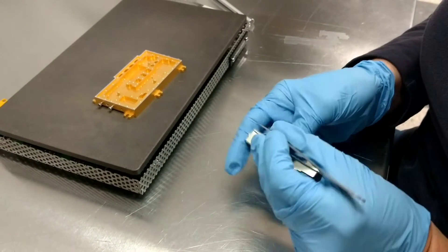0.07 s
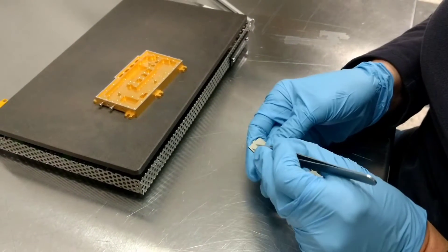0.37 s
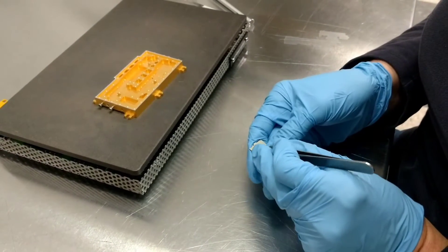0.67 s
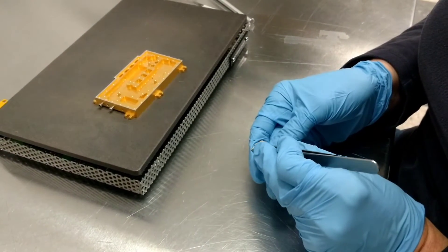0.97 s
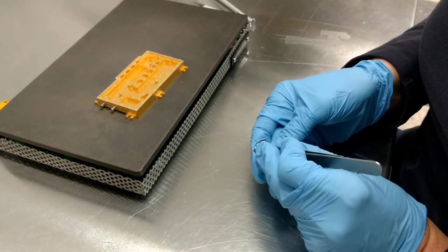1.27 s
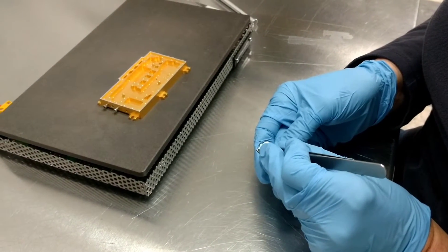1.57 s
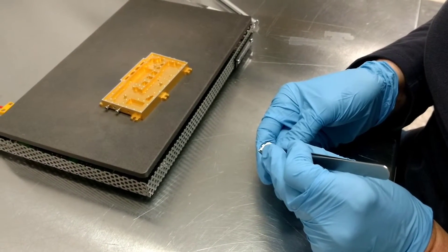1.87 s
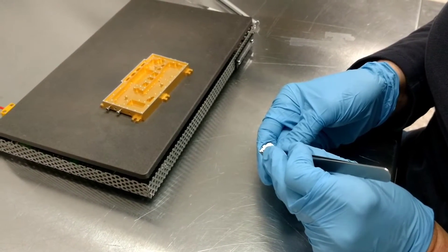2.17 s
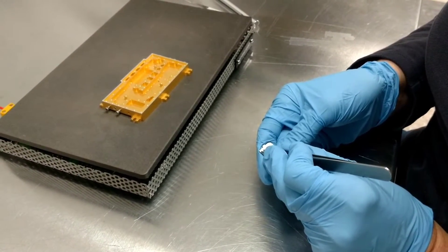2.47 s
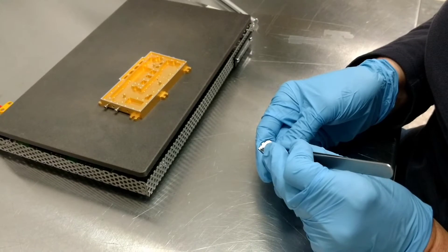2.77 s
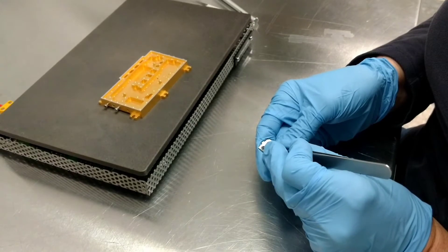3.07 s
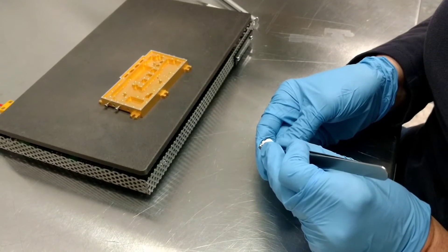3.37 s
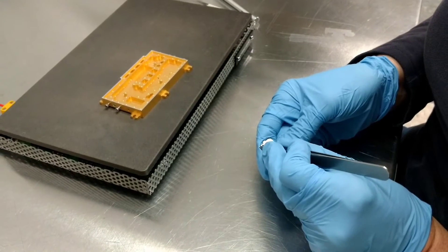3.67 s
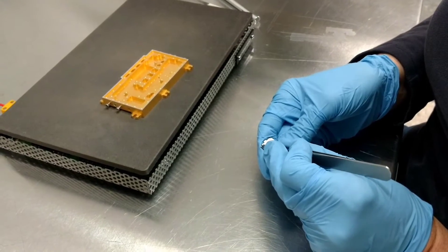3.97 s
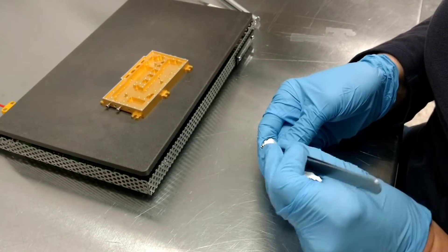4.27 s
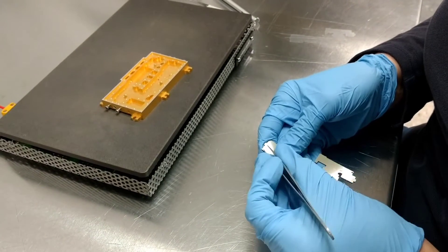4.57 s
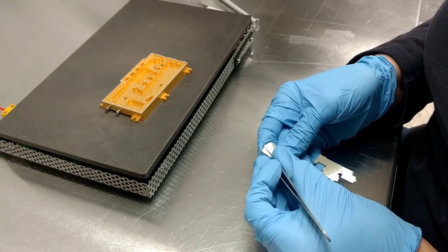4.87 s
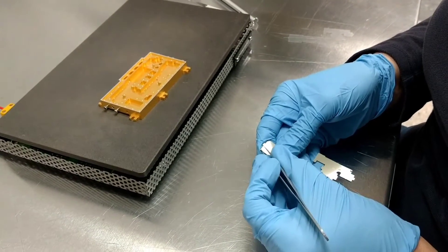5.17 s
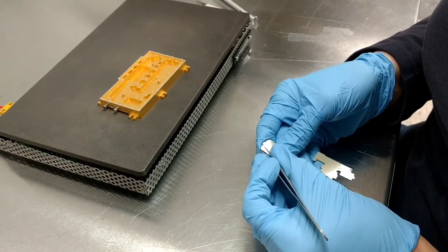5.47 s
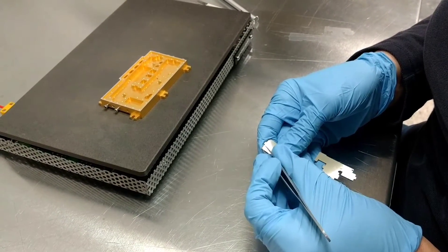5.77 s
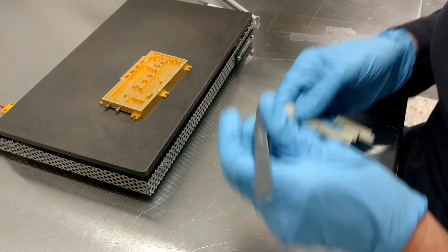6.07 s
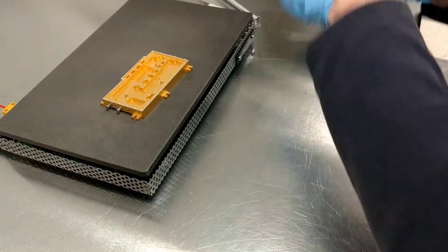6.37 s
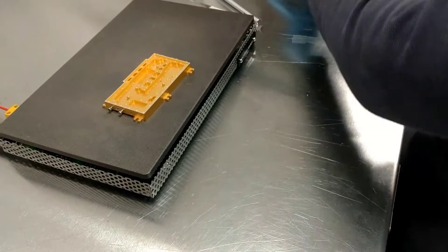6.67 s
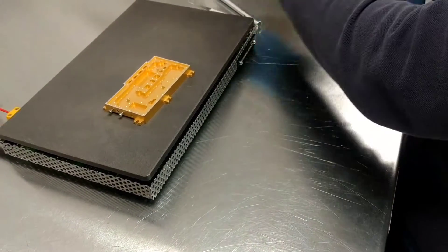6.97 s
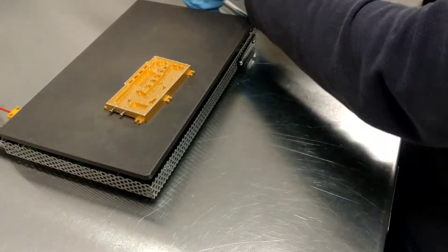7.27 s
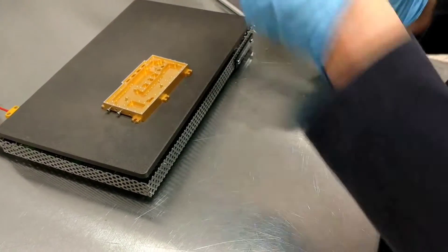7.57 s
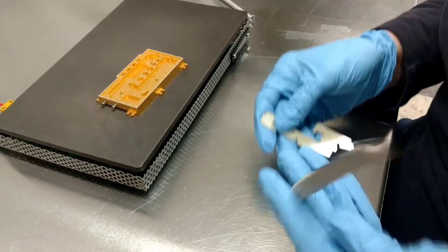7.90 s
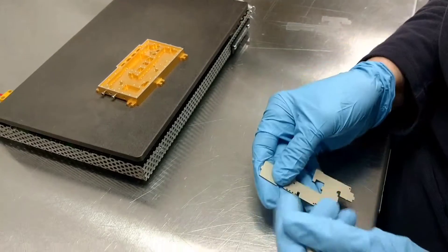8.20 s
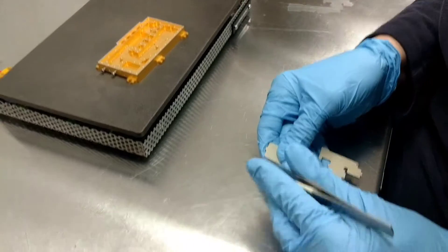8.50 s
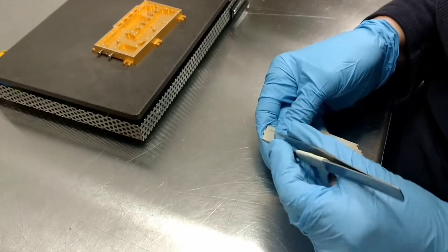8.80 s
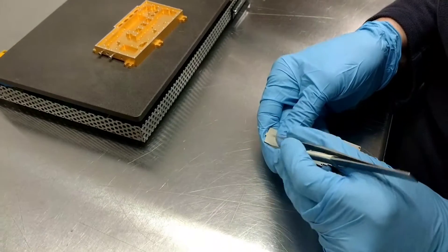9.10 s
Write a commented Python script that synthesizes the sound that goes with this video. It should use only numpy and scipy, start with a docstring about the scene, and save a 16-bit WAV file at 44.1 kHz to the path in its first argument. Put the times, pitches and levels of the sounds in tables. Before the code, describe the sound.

Steady equipment hum and rushing air, broken late by one sharp snap, a brief rattle and a small metallic clink.

```python
"""A laboratory bench. Fans and a motor hum over a steady rush of air, and a low drone soon dies away.
A glove rustles, then tweezer tips tick twice. Near seven seconds a catch snaps open, loose parts
scrape and rattle, and a small metal part slides and clinks down. Last, gloves crinkle and sleeves rustle.
After the sharpest clicks a limiter turns the hum down and lets it swell again."""
import sys
import numpy as np
from scipy import signal
from scipy.fft import rfft, irfft
from scipy.io import wavfile
from scipy.ndimage import uniform_filter1d, minimum_filter1d

SR = 44100
rng = np.random.default_rng(int(sys.argv[2]) if len(sys.argv) > 2 else 0)


def waveform_to_disk(signal):
    """Save audio, clipped to [-1, 1], as 16-bit WAV at the path in sys.argv[1]."""
    frames = np.transpose(np.atleast_2d(signal))
    scaled = np.clip(frames, -1, 1) * 32767
    samples = np.round(scaled).astype(np.int16)
    wavfile.write(sys.argv[1], SR, samples)


N = 407484
TIME = np.arange(N) / SR
FREQ = np.arange(N // 2 + 1) * SR / N + 1e-6
SHAFT_HZ = 59.025  # motor turns per second

# Hollow resonances of the loose parts. Each row: pitch in Hz, width in Hz, boost in dB.
LOOSE_BODY = [(3750, 400, 8), (5300, 650, 11), (8300, 300, 4), (9100, 250, 5), (9740, 300, 7),
              (11200, 300, 5), (12450, 500, 6), (13400, 300, 6)]
# Damped resonances of the small metal part. Each row: pitch in Hz, width in Hz, boost in dB.
METAL_BODY = [(4150, 400, -10), (5300, 350, 8), (7000, 450, 6), (8500, 540, 2), (9600, 400, 6),
              (10900, 450, 6), (12200, 400, 4), (13800, 400, 4)]


def undb(db):
    """Turn decibels into a gain."""
    return 10 ** (np.asarray(db) / 20)


def spectrum(points, hz):
    """Join (Hz, value) points into a curve, giving each octave equal room."""
    point_hz, value = np.transpose(points)
    return np.interp(np.log(hz), np.log(point_hz), value)


def peaks(resonances):
    """The boost in dB that resonances give each frequency."""
    return sum(lift / (1 + (2 * (FREQ - hz) / width) ** 2) for hz, width, lift in resonances)


def pan(db):
    """Two gains that make the left side db louder than the right."""
    return undb(np.array([[1], [-1]]) * db / 2)


def wander(rate_hz):
    """A smooth random curve with a spread of 1, moving at up to about rate_hz."""
    curve = irfft(rfft(rng.standard_normal(N)) / (1 + (FREQ / rate_hz) ** 4), N)
    return curve / curve.std()


def hiss(colour, resonances=()):
    """Shaped noise of average strength 1, unrelated left and right."""
    gain = undb(spectrum(colour, FREQ) + peaks(resonances))
    noise = irfft(rfft(rng.standard_normal((2, N))) * gain, N)
    return noise / noise.std()


def fade(age, t60):
    """Die away from age 0, falling 60 dB in t60 seconds."""
    return (age >= 0) * np.exp(-np.log(1000) * np.clip(age / t60, 0, 10))


def swell(start, attack, hold, t60):
    """Rise in a straight line, hold, then die away; times are in seconds."""
    age = TIME - start
    return np.clip(age / attack, 0, 1) * fade(np.maximum(age - attack - hold, 0), t60)


def likeness(hz, ripple_hz=2200):
    """How alike left and right are, as a complex number: unequal paths put the treble out of step."""
    # Match of the two sides. Each row: frequency in Hz, correlation from -1 to 1.
    match = [(125, -0.46), (175, 0.23), (280, 0.83), (390, 0.14), (580, 0.22), (750, 0.81), (1050, 0.98),
             (1500, 0.35), (2200, 1), (3300, 0.15), (4400, 0.94), (6500, 0.56), (10000, -0.00075)]
    turn = 2 * np.pi * np.maximum(hz / ripple_hz - .5, 0)
    depth = np.clip(spectrum(match, hz), -.98, .98)
    return depth * (np.cos(turn) - 0.7j * np.sin(turn))


def tone(hz, right_phase):
    """A sine on a moving pitch, with the right side ahead by right_phase radians."""
    phase = 2 * np.pi * (np.cumsum(hz) / SR + rng.random())
    return np.sqrt(2) * np.sin([phase, phase + right_phase])


def crack(start, db, rise, t60, room_db=-19, room_t60=.27):
    """Power of one contact over time: a quick burst and a short echo of the room."""
    age = TIME[:SR]
    onset = np.minimum(age / max(rise, 1 / SR), 1)
    decay = fade(age, t60) ** 2 + (undb(room_db) * fade(age, room_t60)) ** 2
    return np.pad((undb(db) * onset) ** 2 * decay, (int(start * SR), N))[:N]


def ring(start, notes, db, tilt_db=0, build_cycles=9):
    """Struck metal rings, its low notes building more slowly; tilt_db is added per octave up."""
    age = TIME[:SR]
    out = 0
    for hz, note_db, t60 in notes:
        gain = undb(db + note_db + tilt_db * np.log2(hz / notes[0][0]))
        onset = np.minimum(age * hz / build_cycles, 1)
        phase = 2 * np.pi * (hz * age + rng.random()) + np.array([[0], [rng.normal()]])
        out = out + gain * onset * fade(age, t60) * np.sin(phase)
    return np.pad(out, ((0, 0), (int(start * SR), N)))[:, :N]


def air(swell_db=0.65):
    """Swirling air from the fans rushes through ducts, almost steady."""
    # The rush. Each row: frequency in Hz, level in dB per Hz.
    rush = [(40, -87), (55, -72.5), (80, -71), (120, -58.5), (160, -63), (245, -58), (310, -64),
            (430, -63.5), (610, -67.5), (740, -66.5), (1050, -73.5), (1650, -75.5), (2500, -86.5),
            (5500, -90.5), (10500, -100)]
    # Duct resonances. Each row: pitch in Hz, width in Hz, boost in dB.
    ducts = [(147, 12, 2), (198, 12, 1.5), (238.6, 12, 1), (287, 8.1, 1.5), (426.4, 18.5, 5),
             (518, 11.4, 4), (525, 19.6, 5), (545.6, 14, 5.5)]
    # Balance of the sides. Each row: frequency in Hz, left minus right in dB.
    balance = [(100, 2.5), (250, -3), (700, 0.5), (3500, 0.5), (5500, 2), (8500, 6), (12000, -2)]
    left, unrelated = rfft(rng.standard_normal((2, N)))
    alike = likeness(FREQ)
    right = alike * left + np.sqrt(1 - abs(alike) ** 2) * unrelated
    colour = undb(spectrum(rush, FREQ) + peaks(ducts)) * pan(spectrum(balance, FREQ))
    return irfft(np.array([left, right]) * colour, N) * np.sqrt(SR / 2) * undb(swell_db * wander(4.3))


def fans(drift_hz=0.3, waver_db=1.4):
    """Fans and transformers hum; each tone drifts on its own, and close neighbours beat."""
    # Each row: pitch in Hz, level in dB, left minus right in dB, right side's lead in radians.
    hum_tones = [(59.2, -56, 1, 2.3), (105.6, -45.5, -3, 2.4), (118.8, -40.3, 2, 2.4),
                 (123.5, -47.5, 1, 2.4), (130, -38.7, -3, 2.4), (180, -51.5, 3, 1.4), (211.3, -54, -6, -.6),
                 (239.9, -44.5, -4, .9), (287.8, -41.5, -3, .6), (356.6, -55, 3, -1), (416, -52, -2, .9),
                 (475.4, -51, -6, 2.4), (531.1, -54, -1, .8), (572.1, -46, 1, 2.5), (575.8, -53, -1, -1),
                 (650.2, -58, 6, .5), (653.7, -58, 13, 1.3), (718.7, -53, 3, .3), (860.2, -50.3, -2, .7),
                 (942.8, -63, 1, 0), (1783.9, -67, 0, 0)]
    out = 0
    for hz, db, side_db, right_phase in hum_tones:
        hum = tone(hz + drift_hz * wander(1.0), right_phase)
        out = out + hum * undb(db + waver_db * wander(3.7)) * pan(side_db)
    return out


def fan_blade(hz=692.3, db=-39.5, drift_hz=0.31, waver_db=1.6, screen_db=-3):
    """The leading fan tone turns softer as the worker leans across the bench and screens it."""
    screened = np.clip(TIME - 5.8, 0, 1)  # leaning over takes one second
    gain = undb(db + screen_db * screened + waver_db * wander(5.5))
    return tone(hz + drift_hz * wander(0.62), right_phase=0.49) * gain * pan(-1)


def motor_whine(slip=.0002, waver_db=3.5):
    """A two-pole motor whines at high multiples of its turning rate, each swelling and fading."""
    # The strongest multiples of the turning rate, and the level of each in dB.
    multiples = [20, 21, 22, 23, 24, 25, 26, 28, 37, 53, 59, 60, 65, 72]
    levels_db = [-54, -57.5, -63.5, -68, -66.5, -61.5, -90, -62.5, -70, -81, -80.5, -83, -76, -76]
    # Swells of single tones. Each row: multiple, peak time in seconds, length in seconds, boost in dB.
    swells = [(20, 3.4, .9, 5), (20, 4.75, .8, 3), (20, 6.6, .5, 4), (21, .65, .6, 9), (21, 2.5, .9, 5),
              (21, 3.25, .5, 10), (21, 4.75, .6, 9), (21, 6.7, .7, 7), (21, 8.7, .9, 6), (24, .95, .6, 12),
              (24, 2.15, .6, 11), (24, 4.15, .6, 11), (24, 6.35, .4, 7), (24, 8.4, 1.2, 10),
              (25, 1.9, .5, 7), (25, 3.9, .7, 10), (25, 6.1, .7, 9), (53, .27, .18, 14), (53, .5, .25, 22),
              (53, .85, .45, 15), (53, 2.5, .35, 9), (53, 3.65, .4, 9)]
    shaft_hz = SHAFT_HZ * (1 + slip * wander(0.95))
    out = 0
    for multiple, db in zip(multiples, levels_db):
        lift_db = sum(boost * .5 ** ((2 * (TIME - peak) / length) ** 2)
                      for which, peak, length, boost in swells if which == multiple)
        whine = tone(multiple * shaft_hz, np.angle(likeness(multiple * SHAFT_HZ)))
        out = out + whine * undb(db + lift_db + waver_db * wander(3.0))
    return out


def motor_buzz(width_hz=0.64):
    """The motor's weak multiples: thin bands of noise, like tones that the room makes waver."""
    # Strength of the buzz. Each row: frequency in Hz, level of one band in dB.
    colour = [(1100, -94), (2000, -64), (2700, -89), (3200, -73.5), (4400, -84.5), (5300, -77.5),
              (7500, -100), (8400, -91), (9400, -81)]
    off_multiple_hz = (FREQ / SHAFT_HZ + .5) % 1 * SHAFT_HZ - SHAFT_HZ / 2
    comb = np.exp(-np.pi / 2 * (off_multiple_hz / width_hz) ** 2) / np.sqrt(width_hz)
    in_range = (FREQ > colour[0][0]) & (FREQ < colour[-1][0])
    left = rfft(rng.standard_normal(N)) * comb * in_range * undb(spectrum(colour, FREQ))
    right = left * np.exp(1j * np.angle(likeness(FREQ)))
    return irfft([left, right], N) * np.sqrt(SR / 2)


def drone(hz=102.5, sag_hz_per_s=1.4, db=-31.5, fade_db_per_s=6.5, stop_s=1.45):
    """A low tone sags in pitch as it fades, then dies away quickly."""
    gain = undb(db - fade_db_per_s * TIME) * fade(np.maximum(TIME - stop_s, 0), t60=1)
    return tone(hz - sag_hz_per_s * TIME, right_phase=2.12) * gain


def sleeves(grain_db=1.3):
    """Sleeves and gloves rub in small uneven slips; slow strokes also die away slowly."""
    # Each row: start in seconds, rise in seconds, level in dB.
    strokes = [(.15, .045, -53), (7.69, .185, -45), (8.13, 0.063, -48), (8.231, 0.044, -48),
               (8.37, .06, -55)]
    # Rubbing cloth and rubber. Each row: frequency in Hz, level in dB.
    colour = [(500, 2), (2000, -3), (3500, 10.5), (5500, 3), (8500, 9), (10000, 2), (16000, 2),
              (20000, -20)]
    power = sum((undb(db) * swell(start, rise, hold=0, t60=3.3 * rise)) ** 2 for start, rise, db in strokes)
    return hiss(colour) * np.sqrt(power) * undb(grain_db * wander(220)) * pan(1.5)


def tweezers(ping_hz=17000, contact_s=0.00032, scratch_db=-23):
    """Steel tips meet with a faint scratch and a very high ping, which record() later filters out."""
    # Each row: time in seconds, level in dB.
    ticks = [(1.241, -17), (2.942, -5.5)]
    scratch = undb(scratch_db) * hiss([(4000, -26), (9000, -3), (13000, -1)])
    out = 0
    for start, db in ticks:
        age = np.maximum(TIME - start, 0)
        push = age / contact_s * np.exp(1 - np.minimum(age / contact_s, 50))
        out = out + undb(db) * push * (np.sin(2 * np.pi * ping_hz * age) + scratch)
    return out


def snap():
    """A catch gives way with a bright crack and rings; its casing answers later and duller."""
    # Each row: start in seconds, level in dB, rise in seconds.
    contacts = [(6.759, -28, .002), (6.764, -4, 0.00051)]
    # The crack and the casing's answer. Each row: frequency in Hz, level in dB.
    crack_colour = [(150, -25), (500, -7), (1100, 8), (2400, -20), (3300, -7), (6500, -7), (11000, -1),
                    (15000, 2), (17000, 6.5), (20000, 1)]
    case_colour = [(150, -17), (1000, 5), (1700, -3), (2500, -3), (3700, 3), (5400, 1), (7000, 0),
                   (9000, -3), (14000, -20)]
    # The ringing catch. Each row: pitch in Hz, level in dB, seconds to fall 60 dB.
    notes = [(1820, -7, .13), (3840, -9, 0.16), (5070, -9, .11), (5760, -0.5, 0.094), (6050, -6, .1),
             (7000, -3, .1), (7526, -4, .09), (7970, -1, .11), (9200, -1, 0.13), (10340, -1, .08),
             (11330, 1.5, .085), (11660, 0, .06), (13700, 3, .07)]
    open_s = contacts[-1][0]
    power = sum(crack(start, db, rise, t60=0.074, room_db=-21) for start, db, rise in contacts)
    case_power = crack(open_s, db=-15, rise=0.017, t60=0.14, room_db=-13)
    burst = np.sqrt(power) * hiss(crack_colour)
    casing = np.sqrt(case_power) * hiss(case_colour)
    return burst + casing + ring(open_s, notes, db=-18.5)


def scrape(db=-27, grit_db=0.5):
    """Loose parts rub on each other between their knocks, then settle smoothly."""
    # The rubbing. Each row: frequency in Hz, level in dB.
    colour = [(150, -20), (500, 10), (1100, 9.5), (2400, -8), (3200, 2), (5000, -4), (7000, 2), (10000, -1),
              (15000, -6), (20000, -20)]
    push = swell(start=6.821, attack=0.0042, hold=0.072, t60=0.46)
    return hiss(colour, LOOSE_BODY) * push * undb(db + grit_db * wander(600)) * pan(0.5)


def knocks(rise_s=0.0033, ring_db=-15.5, grit_db=1.0):
    """The loose parts knock and ring briefly; each knock is a cluster of tiny contacts."""
    # Each row: start in seconds, level in dB.
    hits = [(6.822, -11.5), (6.829, -12.5), (6.849, -21), (6.861, -12.5), (6.881, -24), (6.896, -18),
            (6.904, -18), (6.931, -19), (6.939, -15.5), (6.961, -21), (6.990, -31), (7.031, -35),
            (7.19, -37)]
    # The noise of a knock. Each row: frequency in Hz, level in dB.
    colour = [(150, -23), (500, 0), (1100, 7), (1700, -1), (2400, -15), (3200, 3), (4000, -9), (4800, -7),
              (6500, -2.5), (10000, 6), (13500, 2), (16000, 0), (20000, -6)]
    # The ringing parts. Each row: pitch in Hz, level in dB, seconds to fall 60 dB.
    notes = [(3670, -2.5, 0.079), (4900, -4, 0.059), (5220, 3, 0.07), (5660, 0, 0.061), (9090, 1, .07),
             (9630, 0, .07), (11200, -2, .06), (12400, 1, .06)]
    power = sum(crack(start, db, rise_s, t60=0.06) for start, db in hits)
    rings = sum(ring(start + rise_s, notes, db + ring_db) for start, db in hits)
    clatter = np.sqrt(power) * undb(grit_db * wander(700)) * hiss(colour, LOOSE_BODY)
    return (clatter + rings) * pan(2.5)


def slide(db=-36, grit_db=1.0):
    """The small part drags over metal: a bright rasp of tiny contacts."""
    # The rasp. Each row: frequency in Hz, level in dB.
    colour = [(500, -6), (1800, 3), (2500, -7), (3500, 2), (4400, -6), (5500, 4), (8000, 4), (10500, 5),
              (13000, 1), (16000, 2), (20000, -20)]
    push = swell(start=7.175, attack=.083, hold=.01, t60=.19)
    return hiss(colour, METAL_BODY) * push * undb(db - grit_db * wander(800)) * pan(2)


def clinks(bench_db=-4.5):
    """The small metal part touches down: a crack, a ring and a dull answer from the bench."""
    # Each row: start in seconds, crack level in dB, ring level in dB, ring brightness in dB per octave.
    hits = [(7.3155, -23.5, -37, -5), (7.347, -28, -55, 0), (7.364, -30, -50, 8)]
    # The ringing part. Each row: pitch in Hz, level in dB, seconds to fall 60 dB.
    notes = [(1610, 5.5, 0.2), (1820, -3, .14), (4120, -9, 0.1), (5670, 7, 0.079), (5640, -5, .06),
             (7080, -6, 0.086), (10400, -10, .07), (12120, -16, 0.08)]
    # The crack and the bench's answer. Each row: frequency in Hz, level in dB.
    crack_colour = [(150, -20), (1100, 2), (2400, -12), (3300, -2), (6500, 1), (10000, 2), (13500, 0),
                    (16000, 0), (20000, -15)]
    bench_colour = [(150, -13), (500, 1), (1050, 9), (1800, -6), (2400, -20), (4000, -9), (9000, -30)]
    power = sum(crack(start, db, rise=0.00085, t60=0.052, room_db=-16) for start, db, _, _ in hits)
    bench_power = sum(crack(start, db + bench_db, rise=0.01, t60=0.26) for start, db, _, _ in hits)
    rings = sum(ring(start, notes, db, tilt_db) for start, _, db, tilt_db in hits)
    cracks = np.sqrt(power) * hiss(crack_colour, METAL_BODY)
    bench = np.sqrt(bench_power) * hiss(bench_colour)
    return (cracks + bench + rings) * pan(2)


def crinkles():
    """Folds of thin glove rubber flip over with short dry ticks."""
    # Each row: start in seconds, level in dB.
    folds = [(7.619, -34.5), (7.8566, -41), (7.8851, -35), (7.9674, -46), (8.0855, -39.5), (8.2647, -47)]
    # The tick of a fold. Each row: frequency in Hz, level in dB.
    colour = [(1000, -8), (3500, -1), (6000, 5), (8500, 4), (11000, 1), (16000, -2), (20000, -13)]
    power = sum(crack(start, db, rise=0.00044, t60=0.016, room_db=-17) for start, db in folds)
    return np.sqrt(power) * hiss(colour) * pan(2)


def scene():
    """Machines all round, handwork on the bench."""
    machines = air() + fans() + fan_blade() + motor_whine() + motor_buzz() + drone()
    return machines + snap() + knocks() + scrape() + slide() + clinks() + tweezers() + sleeves() + crinkles()


def limiter(sound, top_db=-17.0, hold_s=.29, release_db_per_s=11):
    """The volume drops at once when the level passes top_db, holds, then climbs back steadily."""
    power = uniform_filter1d(np.mean(sound ** 2, axis=0), size=88)  # averaged over 2 ms
    over_db = np.maximum(10 * np.log10(np.maximum(power, 1e-12)) - top_db, 0)
    half_hold = int(hold_s * SR) // 2
    held_db = -minimum_filter1d(-over_db, 2 * half_hold + 1, origin=half_hold)  # largest recent excess
    climb_db = release_db_per_s * TIME
    return sound * undb(climb_db - np.maximum.accumulate(held_db + climb_db))


def record(dry, top_hz=15500):
    """The limiter, then a steep cut of the highest treble."""
    low_pass = signal.ellip(10, .2, 80, top_hz, fs=SR, output="sos")
    return signal.sosfilt(low_pass, limiter(dry))


dry = scene()
out = record(dry)
waveform_to_disk(out)
```